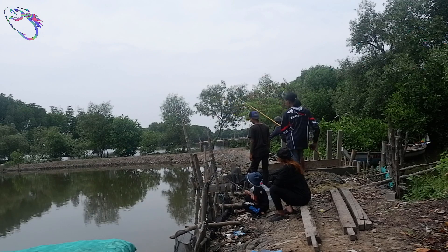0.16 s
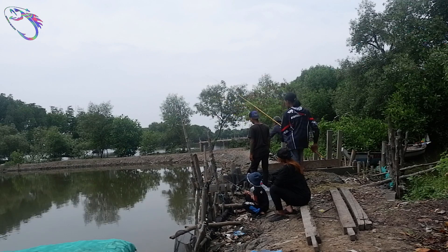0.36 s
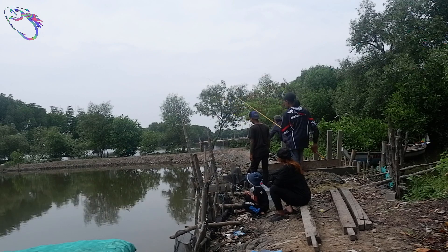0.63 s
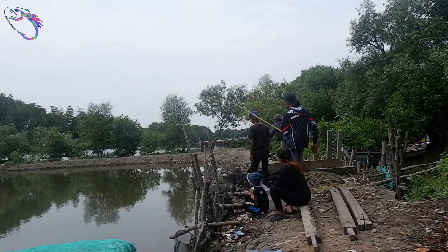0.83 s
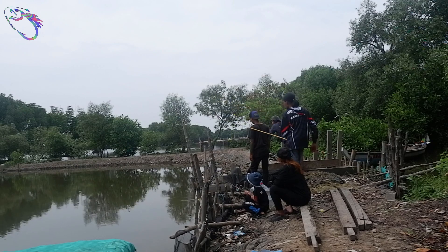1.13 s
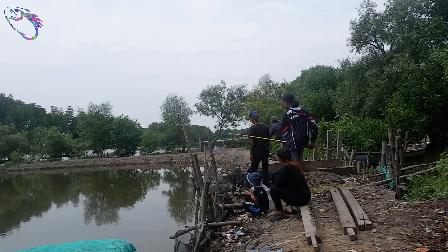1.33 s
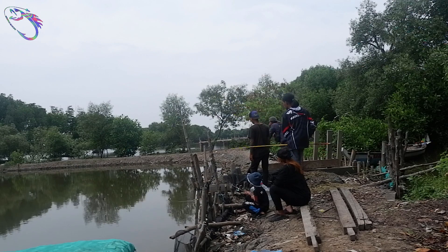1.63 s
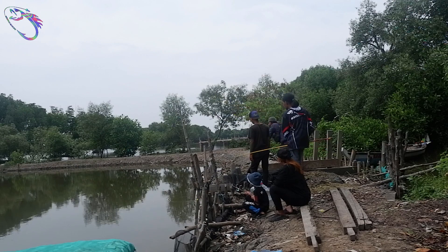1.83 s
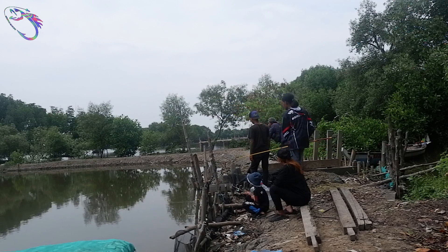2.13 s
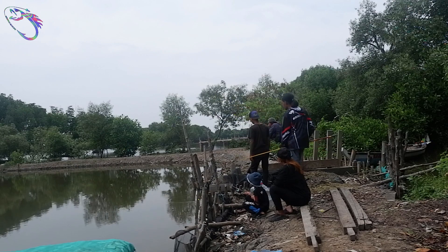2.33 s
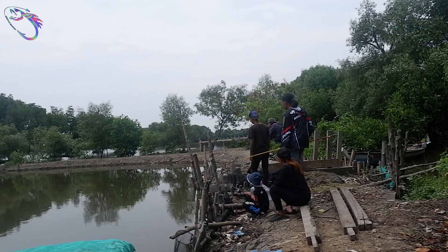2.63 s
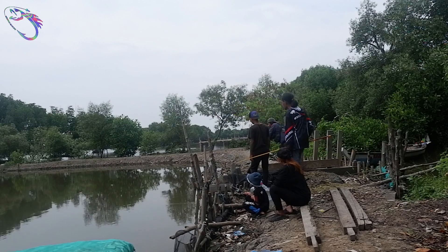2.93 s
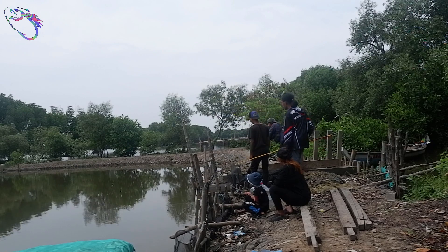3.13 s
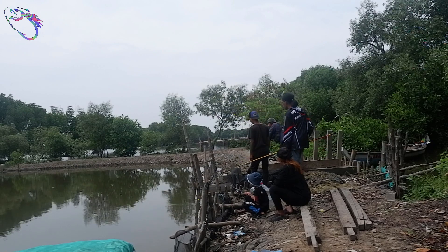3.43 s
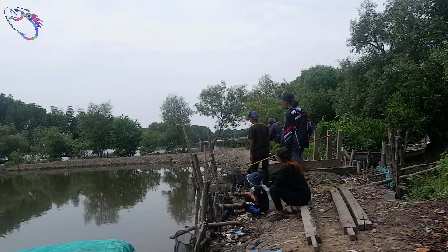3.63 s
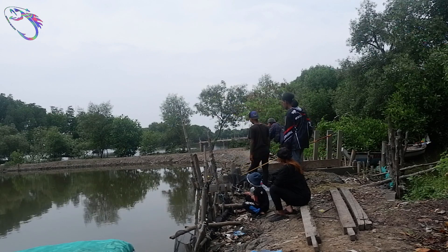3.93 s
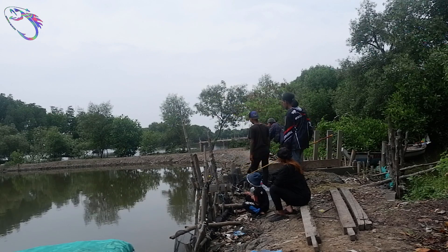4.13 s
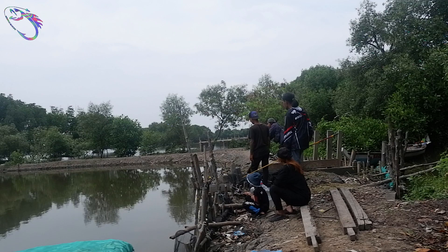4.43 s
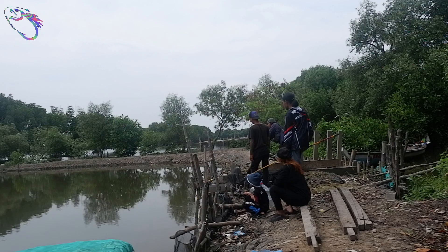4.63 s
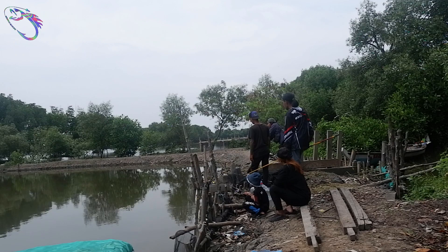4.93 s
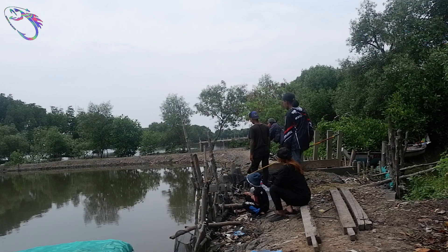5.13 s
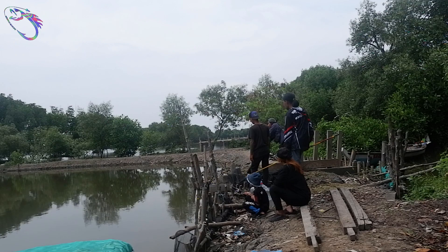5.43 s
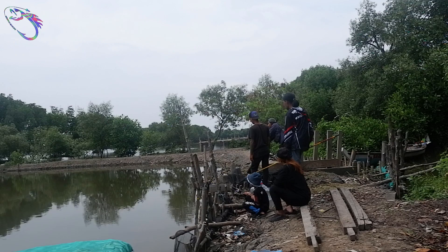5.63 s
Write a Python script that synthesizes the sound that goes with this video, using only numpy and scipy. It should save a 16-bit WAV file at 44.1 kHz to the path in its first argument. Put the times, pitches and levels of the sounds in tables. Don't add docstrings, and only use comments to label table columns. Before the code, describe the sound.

Outdoor pond-side ambience on a wide stereo microphone without wind protection. Gusty thuds and flutter crowd the first two and a bit seconds, ease, rumble again mid-way, pop around four seconds, then calm. Throughout, very high cricket trills start and stop over a fuzzy insect chorus, a nearby bird repeats brief downward whistles, mostly to the left, and foliage hisses softly over a distant low engine hum.

```python
import sys
import numpy as np
from scipy import signal
from scipy.io import wavfile
from scipy.ndimage import uniform_filter1d

SR = 44100
rng = np.random.default_rng(int(sys.argv[2]) if len(sys.argv) > 2 else 0)


def wrap_up_sound(samples):
    columns = np.atleast_2d(samples).T
    tamed = np.clip(columns, -1, 1)
    steps = np.round(tamed * 32767).astype(np.int16)
    wavfile.write(sys.argv[1], SR, steps)


def undo_db(level):
    steps = np.asarray(level, float) / 20
    return 10 ** steps


N = 254456

# time_s, strength_db, head_on (0-1: how alike it is at both ports)
WIND = [(0, -53.5, .25), (.4, -48.5, 1), (.7, -50.5, 0.88), (1.0, -47.5, 1), (1.3, -48.5, 0.88),
        (1.5, -47.5, 1), (1.75, -45.5, 0.74), (2.0, -60.5, 0.1), (2.3, -58, 0.5), (2.5, -58.5, 0.8),
        (2.62, -45.5, 1), (3.1, -47.5, 1), (3.6, -48, 1), (4.05, -50, 0.9), (4.35, -60, 0.63),
        (5.1, -59.5, 0.73), (5.32, -55.5, 0.44), (5.77, -60.5, 0.65)]


def evened(x):
    return x / np.sqrt(np.mean(x ** 2) + 1e-20)


def read(points, hz):
    f, value = np.transpose(points)
    return np.interp(np.log(hz + 1), np.log(f + 1), value)


def add(mix, s, sound):
    part = mix[..., max(round(s * SR), 0):][..., :sound.shape[-1]]
    part += sound[..., :part.shape[-1]]


def resonate(x, hz, width):
    turn = np.exp(2j * np.pi * np.cumsum(hz * np.ones(N)) / SR)
    r = np.exp(-np.pi * width / SR)
    smooth = signal.lfilter([(1 - r) ** 2], [1, -2 * r, r * r], x / turn)
    return 2 * (turn * smooth).real


def wander(rate_hz):
    knots = rng.standard_normal(800)
    return evened(np.interp(np.arange(N) / SR * rate_hz, np.arange(800), knots))


def noise(spectrum, alike, patchy_db, size):
    hop = size // 4
    frames, hz = N // hop + 5, np.fft.rfftfreq(size, 1 / SR)
    a, b, c, d, patches = rng.standard_normal((frames, len(hz), 5)).T
    patches = uniform_filter1d(patches, size=8, axis=0)
    patches = evened(uniform_filter1d(patches, size=6, axis=1))
    same = np.clip(alike(np.arange(frames) * hop / SR, hz[:, None]), 0, 1)
    left = a + 1j * b
    right = same * left + np.sqrt(1 - same ** 2) * (c + 1j * d)
    z = np.array([left, right]) * undo_db(read(spectrum, hz)[:, None] + patchy_db * patches)
    return evened(signal.istft(z, nperseg=size, noverlap=size - hop)[1][:, :N])


def scatter(x, t60):
    taps = np.zeros((2, SR // 2))
    slots = np.arange(60, SR // 2 - 20, 20)
    at = slots + rng.integers(0, 20, (2, len(slots)))
    np.put_along_axis(taps, at, rng.choice([-1., 1.], at.shape), 1)
    taps *= undo_db(-60 * np.arange(SR // 2) / SR / t60)
    return signal.fftconvolve(x, taps / np.linalg.norm(taps[0]), axes=1)[:, :N]


def shimmer(x, t60, turn_hz):
    sway = np.pi * turn_hz * np.arange(N) / SR
    return sum(scatter(np.sqrt(2 / 3) * np.cos(sway + k * np.pi / 3) * x[None], t60) for k in range(3))


def breeze():
    s, strength_db, _ = np.transpose(WIND)
    return np.interp(np.arange(N) / SR, s, strength_db) + 51


def engine():
    # multiple, level_db
    harmonics = [(4, -63), (5, -70.5), (6, -70), (7, -65.5), (9, -77.5), (18, -78.5)]
    firing_hz = 74.76
    turns = np.cumsum(firing_hz * (1 + .005 * wander(9))) / SR
    hum = 0
    for multiple, db in harmonics:
        hum = hum + undo_db(db + 2.0 + 2.4 * wander(14)) * np.sin(2 * np.pi * round(multiple) * turns)
    return hum * undo_db(-.3 * uniform_filter1d(breeze(), size=12000) - 1.6)


def leaves():
    # pitch_hz, level_db (per Hz)
    hiss = [(300, -36), (700, -23), (1200, -5), (2000, -3), (3500, -4.5), (6000, -5), (9000, -7.5),
            (12000, -8), (16000, -10.5)]
    # pitch_hz, likeness (0-1)
    likeness = [(500, .3), (1400, .15), (3000, .08), (6000, 0), (16000, 0)]
    return undo_db(-52.5) * noise(hiss, lambda time, hz: read(likeness, hz), 1.0, size=1024)


def distant():
    # pitch_hz, width_hz, level_db
    bands = [(8247, 250, -55), (8770, 120, -74), (7810, 420, -61.5), (4115, 630, -66.5)]
    out = 0
    for hz, width, db in bands:
        blur = evened(resonate(rng.standard_normal((2, N)), hz, width))
        out = out + undo_db(db + 1.5 * wander(4.95)) * blur
    return out * undo_db([[-2.5], [2.5]])


def chorus():
    # pitch_hz, strokes_per_s, level_db
    singers = [(7955, 45.8, 0), (7985, 45.2, -4), (7915, 46.6, -8), (8030, 46.1, -9), (7860, 44.7, -12),
               (7790, 45.5, -17), (8530, 46, -15), (8595, 45, -17)]
    # start_s, end_s, level_db
    spells = [
        (-.1, 0.44, -55),
        (0.49, 0.865, -58),
        (0.935, 1.61, -55.5),
        (1.9, 2.695, -56),
        (2.86, 2.97, -66),
        (3.05, 3.787, -55.5),
        (4.105, 4.97, -55.5),
        (5.088, 5.9, -53.5),
    ]
    join_s, leave_s = 0.089, 0.12
    choir, song, t = 0, 0, np.arange(N) / SR
    for hz, rate, db in singers:
        beat = np.pi * (np.cumsum(rate * (1 + 0.027 * wander(11.0))) / SR + 3 * rng.random())
        strokes = np.sin(beat) ** 2 * (1 + .5 * np.cos(2 * beat / 3))
        tone = np.sin(2 * np.pi * np.cumsum(hz + 18 * wander(30)) / SR)
        choir = choir + undo_db(db + 1.8 * wander(9)) * strokes * tone
    for start, end, db in spells:
        edge = np.minimum((t - start) / join_s, (end - t) / leave_s)
        song = song + undo_db(db) * np.clip(edge + .5, .03, 1)
    out = evened(choir) * song
    return undo_db(1.1) * (out * np.array([[-.6], [1.7]]) + shimmer(out, .22, 4.3) * undo_db([[-3], [1.5]]))


def twigs():
    # start_s, peak_db, centre_hz, width_hz, length_s
    ticks = [
        (0.438, -30, 11800, 3000, .002),
        (0.463, -48, 11500, 3000, .04),
        (1.274, -48, 10500, 3000, .008),
        (1.445, -27, 9300, 3500, 0.0037),
    ]
    t, out = np.arange(N) / SR, 0
    for s, db, hz, width, length in ticks:
        burst = np.clip((t - s) / 0.0023, 0, 1) * np.exp(-np.maximum(t - s, 0) / length)
        out = out + undo_db(db - 6.5) * burst * evened(resonate(rng.standard_normal((2, N)), hz, width))
    return out


def birds():
    # start_s, length_s, first_hz, level_db, bend (above 1 lingers high)
    chirps = [(0.199, 0.042, 5230, -53, 1.12), (0.745, 0.054, 5190, -53.5, .9),
              (1.377, 0.053, 5320, -52.5, 1.2), (1.928, 0.044, 5450, -53.5, 1.34),
              (2.53, 0.053, 5110, -55, .9), (3.05, 0.052, 5420, -52, 0.96),
              (3.654, .062, 5250, -55.5, 1.05), (4.189, 0.063, 5480, -53, 0.99),
              (4.696, 0.085, 5190, -50, 1.58), (5.285, .086, 5200, -51, 1.44)]
    # start_s, first_hz, level_db
    peeps = [(1.58, 5000, -69), (2.35, 5120, -65.5), (3.22, 4890, -63), (4.464, 5270, -65),
             (5.135, 4950, -63), (.63, 3070, -68), (1.38, 2840, -70), (2.2, 3080, -68), (3.01, 3020, -70),
             (3.85, 2970, -69), (5.65, 3040, -68)]
    # start_s, length_s, first_hz, last_hz, bend, level_db, swell_db, pan_db, direct_db
    calls = [(s, length, hz, 3867, bend, db, 1.5, 7, 2.5) for s, length, hz, db, bend in chirps]
    calls += [(s, 0.04, hz, hz - 129, 1, db, 0, 0, -4) for s, hz, db in peeps]
    out = np.zeros((2, N))
    for start, length, first_hz, last_hz, bend, db, swell_db, pan_db, direct_db in calls:
        u = np.linspace(0, 1, round(length * SR))
        wobble = np.interp(u, np.linspace(0, 1, 9), rng.standard_normal(9))
        hz = first_hz + (last_hz - first_hz) * u ** bend + 18 * wobble
        breath = signal.windows.tukey(len(u), .45) * undo_db(swell_db * (2 * u - 1) + 1.3 * wobble[::-1])
        whistle = breath * np.sin(2 * np.pi * np.cumsum(hz) / SR)
        echoes = undo_db(2.5) * scatter(whistle[None], .3) + undo_db(.6) * scatter(whistle[None], .9)
        echoes = echoes + 0.49 * echoes[::-1]
        pan = np.array([[0], [-pan_db]])
        direct = undo_db(pan + direct_db) * np.pad(whistle, (0, SR // 2 - 1))
        add(out, start, undo_db(db + 2.45) * (direct + echoes * undo_db(pan / 3)))
    return out


def cricket():
    # first_pair_s, last_pair_s, level_db
    trills = [
        (.022, .487, -41),
        (.864, 1.347 - .022, -40.5),
        (1.737, 2.199, -40.5),
        (2.873, 3.335, -41.5),
        (3.955, 4.281, -40.5),
        (4.869, 5.265, -43),
        (5.696, 5.76, -42),
    ]
    out, t = np.zeros(N), np.arange(round(.022 * SR)) / SR
    for first, last, db in trills:
        pairs = np.linspace(first, last, round((last - first) / .066) + 1)
        for s, (a, b, c) in zip(pairs, rng.standard_normal((len(pairs), 3))):
            stroke = np.hanning(len(t)) * np.sin(2 * np.pi * (8300 + 12 * c - 800 * t) * t)
            add(out, s - .01, undo_db(db - 1.5 + 0.24 * a) * stroke)
            add(out, s - .01 + .0222, undo_db(db + 2.3 * b) * stroke)
    return out * np.array([[-.72], [1.5]]) + shimmer(out, .25, 5.3) * undo_db([[-8], [-4]])


def wind():
    # pitch_hz, level_db (per Hz)
    rumble_colour = [(15, -34), (35, -13), (52, -4), (74, 1), (95, -7), (130, -22), (200, -50), (500, -120)]
    buffet_colour = [(70, -49), (100, -10), (125, 0.5), (155, 4.5), (200, -1.5), (260, -14), (350, -22.5),
                     (600, -39), (1500, -120)]
    roar_colour = [(150, -5), (280, -1.5), (400, -8.5), (600, -7.5), (1000, -12), (1600, -17), (3000, -31),
                   (8000, -100)]
    # middle_s, lift_db, eddy_size (0-1: large ones rumble, small ones buffet)
    swells = [(0.084, 29.6, 0.65), (.18, 30.5, 0.66), (.4, 9.7, 0.52), (.45, 6.6, 0.11),
              (0.531, 15.3, 0.73), (0.608, 22, 0.24), (.75, 16.7, 0.92), (0.841, 16.7, 0.22),
              (.96, 10.4, 0.88), (1.085, 20, 0.79), (1.14, 11, 0.39), (1.47, 7, 0.88), (1.55, 7.1, .8),
              (1.67, 11.3, 0.73), (1.9, 11, 0.24), (2.271, 18, .1), (2.68, 11.7, 0.87), (2.88, 13.9, 0.98),
              (2.97, 9.8, 0.47), (3.14, 8, 0.17), (3.3, 1.6, 0.65), (3.41, 6, .9), (3.52, 7.7, 0.9),
              (3.72, 21, 0.64), (3.86, 3.8, 0.73), (3.97, 6, .1), (4.12, 6, 0.43), (5.04, 5.6, 0.16),
              (5.33, 9.4, 0.57), (5.56, 5.6, .2)]
    swell_s = 0.026
    t, slow_db = np.arange(N) / SR, breeze()
    large_db, small_db = 0, 0
    for s, lift_db, big in swells:
        bump = lift_db * np.exp(-((t - s) / swell_s) ** 2)
        large_db = large_db + bump * big
        small_db = small_db + bump * (1 - big)

    def shared(time, hz):
        return .88 * np.interp(time, *np.transpose(WIND)[::2])

    rumble_db = -45 + slow_db + large_db + 1.47 * wander(14)
    buffet_db = -46 + 0.57 * slow_db + 0.87 * small_db + 2.9 * wander(30)
    roar_db = -54.5 - 0.34 * slow_db + 0.092 * small_db + 0.38 * wander(25)
    rumble = undo_db(rumble_db) * noise(rumble_colour, shared, 1.0, size=4096)
    buffet = undo_db(buffet_db) * noise(buffet_colour, shared, 1.4, size=2048)
    roar = undo_db(roar_db) * noise(roar_colour, lambda time, hz: 0.2, 1.7, size=1024)
    return rumble + (buffet + roar) * undo_db([[-.6], [.6]])


def pops():
    # middle_s, port (0 left, 1 right), peak_db, pitch_hz
    eddies = [(0.088, 1, -18, 137), (0.098, 0, -27, 118), (0.528, 1, -17, 138), (0.614, 1, -24, 169),
              (1.089, 1, -14, 190), (1.089, 0, -13.5, 170), (1.098, 1, -31, 230), (1.117, 1, -20, 196),
              (1.183, 0, -26, 172), (1.183, 1, -26, 171), (1.875, 0, -24.5, 179), (1.905, 0, -17.5, 250),
              (1.939, 1, -18, 252), (2.006, 0, -21, 228), (2.019, 1, -20.5, 322), (2.085, 0, -27.5, 229),
              (2.129, 0, -27.5, 220), (2.227, 0, -20, 247), (2.252, 1, -21, 236), (2.266, 1, -18, 212),
              (3.833, 1, -21, 173), (3.971, 0, -26.5, 164), (4.108, 1, -22.5, 246), (4.13, 1, -15, 264),
              (4.157, 1, -24, 228), (4.241, 1, -27, 214), (5.043, 1, -24, 198), (5.347, 0, -28, 187),
              (5.519, 1, -25.5, 230), (5.573, 0, -28, 189)]
    wake_s, wake_db = .03, -9.5
    out, u = np.zeros((2, N)), np.linspace(-1, 1, 1601)
    lags = wake_s * rng.uniform(-1, 1, len(eddies))
    wakes = [(s + lag, 1 - port, db + wake_db, hz) for (s, port, db, hz), lag in zip(eddies, lags)]
    phases = rng.uniform(-.9, .9, (2 * len(eddies), 2))
    for (s, port, db, hz), (a, b) in zip(eddies + wakes, phases):
        turns = u * 800 / SR * hz
        swing = np.cos(2 * np.pi * turns + a) * np.exp(-abs(turns / .8) ** 1.6)
        swing += 0.24 * np.cos(2 * np.pi * 2.15 * turns + 2 * b) * np.exp(-(turns / 0.48) ** 2)
        swing = swing - swing.mean() * 2 * np.hanning(1601)
        add(out[int(port > .5)], s - 800 / SR, undo_db(db - 4.5) * swing)
    return out


def slam():
    # middle_s, peak_db, half_width_s
    push = (0.98, -19.5, 0.0017)
    s, db, width = push
    u = (np.arange(N) / SR - s) / width
    return undo_db(db) * (np.exp(-u ** 2) - np.exp(-(u / 4) ** 2) / 4)


def scene():
    background = engine() + leaves() + distant() + chorus()
    near = twigs() + birds() + cricket()
    return background + near + wind() + pops() + slam()


def band_limit(x):
    return signal.sosfilt(signal.butter(12, 15790, fs=SR, output="sos"), x)


def record(dry):
    mix = dry - .001
    return band_limit(mix)


dry = scene()
out = record(dry)
wrap_up_sound(out)
```